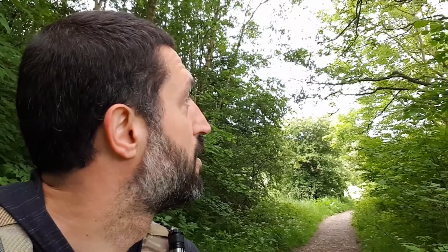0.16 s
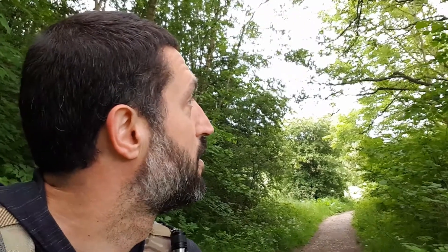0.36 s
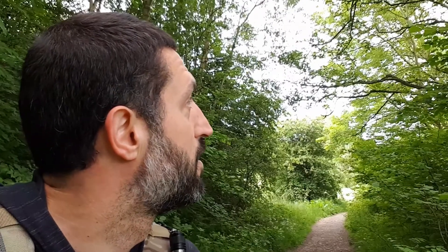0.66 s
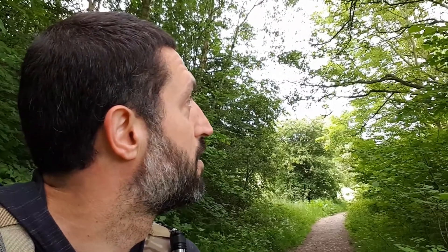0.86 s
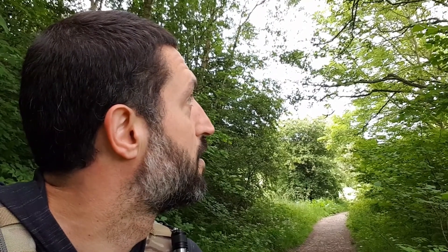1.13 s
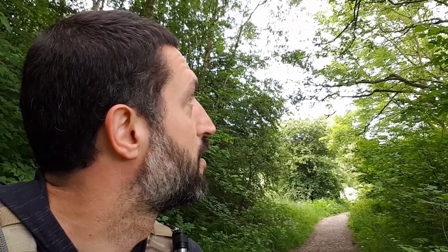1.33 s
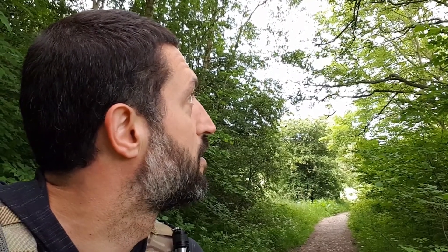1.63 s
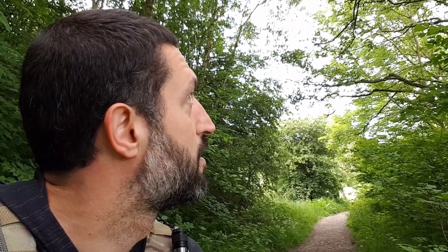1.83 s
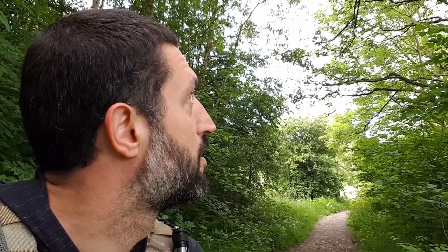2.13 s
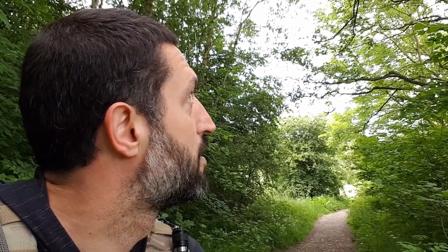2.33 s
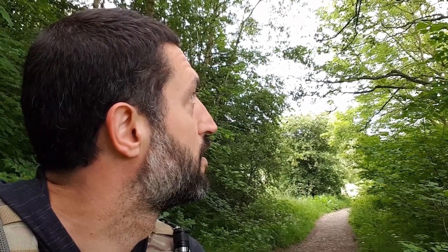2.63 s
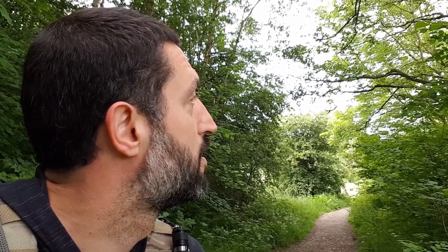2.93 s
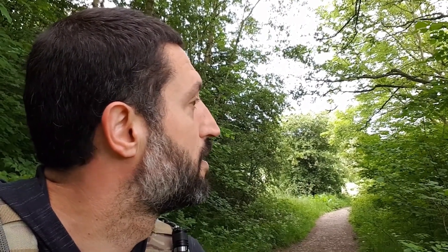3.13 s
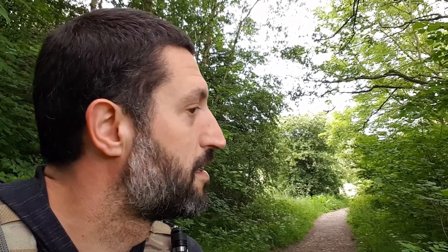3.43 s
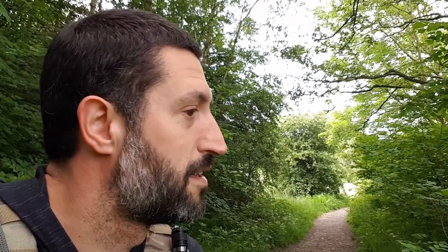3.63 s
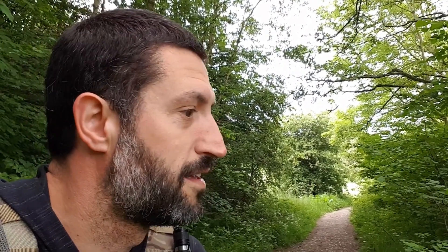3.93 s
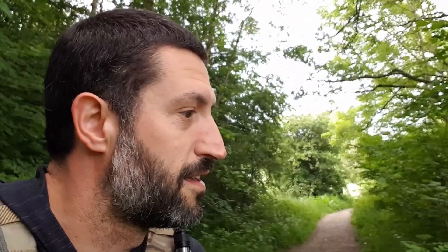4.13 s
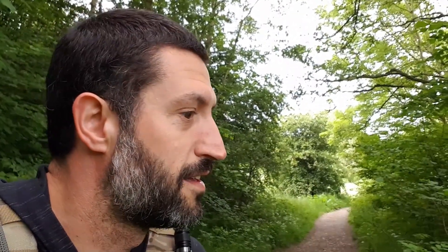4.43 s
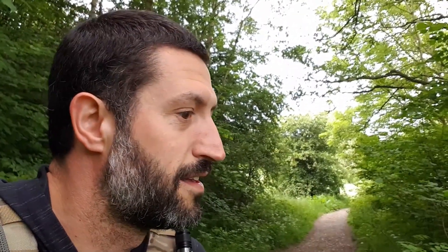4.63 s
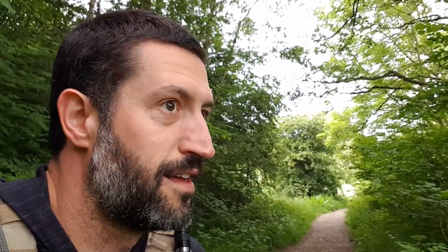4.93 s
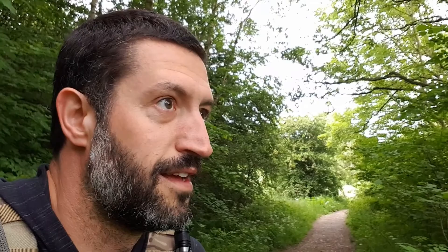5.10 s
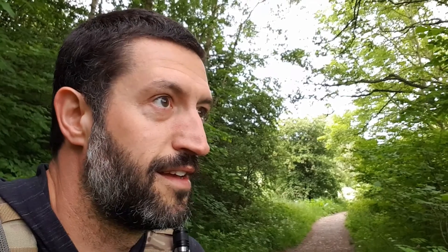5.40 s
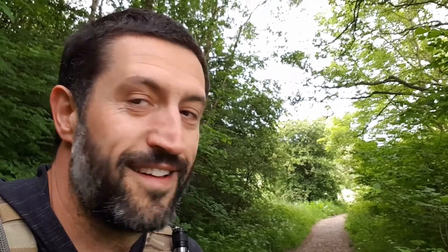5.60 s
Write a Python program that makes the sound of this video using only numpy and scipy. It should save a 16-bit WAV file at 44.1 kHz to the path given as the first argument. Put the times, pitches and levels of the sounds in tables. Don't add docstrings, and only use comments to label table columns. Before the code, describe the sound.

Outdoor birdsong chorus: a dense burst of chirps at first, a curved whistle before one second, flurries through two and three seconds, a sparser stretch after four, then sharp bright chirps near five and at the end. Constant airy hiss and low distant rumble stay behind, with little clicks of twigs. The compact stereo microphone gives a bright, slightly edgy sound.

```python
import sys
import numpy as np
from scipy import signal
from scipy.fft import rfft, irfft
from scipy.io import wavfile
from scipy.ndimage import uniform_filter1d, map_coordinates

SR = 44100
rng = np.random.default_rng(int(sys.argv[2]) if len(sys.argv) > 2 else 0)


def transcribe(u):
    v = np.clip(np.atleast_2d(u).T, -1, 1)
    q = np.round(v * 32767).astype(np.int16)
    wavfile.write(sys.argv[1], SR, q)


def field_ratio(decibels):
    return 10 ** (np.asarray(decibels, dtype=float) / 20)


N = 254016


def unit(x):
    return x / np.sqrt(np.mean(x ** 2) + 1e-20)


def along(points, hz):
    f, v = np.transpose(points)
    return np.interp(np.log(hz + 1), np.log(f + 1), v)


def coloured(x, points):
    return irfft(rfft(x) * field_ratio(along(points, np.fft.rfftfreq(N, 1 / SR))), N)


def wobble(rate_hz, size):
    knots = rng.standard_normal(int(size * rate_hz / SR) + 4)
    return map_coordinates(knots, [np.arange(size) * rate_hz / SR])


# f/Hz, likeness/0-1
PORT_LIKENESS = [(60, .86), (200, .45), (350, .65), (500, .85), (1000, .78), (2000, .68), (2600, .25),
                 (3500, .05), (10000, .0)]
# f/Hz, level/dB
PORT_TILT = [(60, 3.5), (200, 1.5), (380, 8.5), (700, 5.5), (1290, -3), (2380, -2), (4400, 8.5),
             (6900, 6.5), (7900, 11), (9300, 6.5), (11000, 18), (12700, 25), (14200, 26.5), (15600, -15)]
# f/Hz, phase/rad
HOUSING_PHASE = [(60, .1), (400, .3), (950, .9), (1200, .5), (1700, .35), (2300, -.5)]


def rush(spectrum, patchy_db):
    lag_samples = 18.44
    z = signal.stft(rng.standard_normal((2, N)), nperseg=512)[2]
    field = uniform_filter1d(rng.standard_normal(z.shape[1:]), size=6, axis=0)
    field = uniform_filter1d(field, size=12, axis=1)
    pair = signal.istft(z * field_ratio(patchy_db * unit(field)), nperseg=512)[1][:, :N]

    hz = np.fft.rfftfreq(N, 1 / SR)
    turn = np.arccos(np.clip(along(PORT_LIKENESS, hz), 0, 1)) / 2
    gain = field_ratio(along(spectrum, hz))
    shared, own = rfft(pair) * gain * [np.cos(turn), np.sin(turn)]
    tilt = field_ratio(along(PORT_TILT, hz) / 2)
    lead = 2 * np.pi * hz * lag_samples / SR - along(HOUSING_PHASE, hz)
    left = (shared + own) * tilt * np.exp(1j * lead)
    right = (shared - own) / tilt
    both = irfft(np.array([left, right]), N)
    return both / np.sqrt(np.mean(both.mean(axis=0) ** 2))


# f/Hz, density/dB per Hz
HISS_SPECTRUM = [(150, -65), (250, -26), (600, -5), (880, -2.5), (1300, -2), (1630, -1.5), (1970, 0),
                 (2650, -5.5), (3700, -9), (5800, -13.5), (7000, -12.5), (7600, -18), (8100, -25.5),
                 (10000, -59)]
# f/Hz, density/dB per Hz
SIZZLE_SPECTRUM = [(7000, -33), (8200, -10), (9500, -4), (11000, -6), (12550, -6.5), (13300, -8),
                   (14300, -21), (15200, -11), (15800, -20)]
# f/Hz, density/dB per Hz
RUMBLE_SPECTRUM = [(20, -22), (32, -22), (41, -5), (52, 0.5), (65, 1), (110, -1.5), (210, -18), (300, -17),
                   (390, -30.5)]
# t/s, level/dB
TRAFFIC_LEVEL = [
    (0.0, -44),
    (4.41, -44),
    (4.75, -43.5),
    (5.76, -45),
]
# t/s, level/dB
BREEZE_LEVEL = [
    (0.0, -53),
    (.45, -54),
    (5.76, -55.5),
]


def air():
    rumble_under_hiss_db = -12
    t = np.arange(N) / SR
    traffic_db = np.interp(t, *np.transpose(TRAFFIC_LEVEL))
    sizzle_db = np.interp(t, *np.transpose(BREEZE_LEVEL))
    hiss = rush(HISS_SPECTRUM, patchy_db=2.0)
    sizzle = rush(SIZZLE_SPECTRUM, patchy_db=1)
    rumble = rush(RUMBLE_SPECTRUM, patchy_db=-1.45)
    hiss_drift_db = .5 * wobble(rate_hz=6, size=N)
    sizzle_drift_db = .8 * wobble(rate_hz=25, size=N)
    return (field_ratio(traffic_db + hiss_drift_db) * hiss + field_ratio(sizzle_db + sizzle_drift_db) * sizzle
            + field_ratio(traffic_db + rumble_under_hiss_db) * rumble)


# bend of the glide (0 straight, more settles sooner), peak/share of length, swell/dB, fade/dB
HELD = (5.5, .2, 4, 9)
SWEEP = (0.53, 0.087, 0.74, 2.6)
THIN = (0.92, 0.17, 1.5, 2.8)
CLOSE_ECHO_DB, FAR_ECHO_DB = -4, -0.5


def contour(row, manner):
    s, length_s, from_hz, to_hz, db = row
    bend, peak, swell_db, fade_db = manner
    u = np.arange(13) / 12
    bend = max(bend, .01)
    glide = (1 - np.exp(-bend * u)) / (1 - np.exp(-bend))
    shape_db = np.interp(u, [0, np.clip(peak, .05, .95), 1], [-swell_db, 0, -fade_db])
    return np.column_stack([s + length_s * u, from_hz + (to_hz - from_hz) * glide, db + shape_db])


# f/Hz, level/dB
NEAR_SHADOW = [(2200, -6), (3000, 10), (4300, 15.5), (5500, 21.5), (7200, 34)]


def near(rows, manner):
    return [(contour(row, manner), along(NEAR_SHADOW, (row[2] + row[3]) / 2), 0) for row in rows]


# t/s, length/s, f_from/Hz, f_settled/Hz, level/dB
WHISTLES = [ (0.0, .02, 5410, 4820, -35.5), (0.085, 0.054, 4590, 5090, -32.5),
            (0.269, 0.0081, 7220, 6840, -34), (0.32, 0.064, 6450, 6650, -33),
            (1.377, .03, 6050, 6300, -40), (1.439, 0.013, 5580, 5210, -28.5),
            (1.551, 0.088, 6400, 6500, -40), (1.716, .075, 4770, 4946, -35),
            (1.889, 0.028, 4780, 5060, -34), (2.048, 0.038, 5800, 4950, -29.5),
            (2.029, 0.015, 6380, 6250, -35), (2.232, 0.1, 6750, 6880, -43),
            (2.358, 0.038, 6740, 7240, -34.5), (2.542, .018, 5600, 5320, -36),
            (2.65, 0.02, 5450, 5300, -38.5), (3.065, .028, 5810, 5660, -31),
            (3.095, .02, 5740, 5290, -35.5), (3.397, 0.048, 5800, 5586, -32.5),
            (3.468, 0.019, 6600, 6960, -36.5), (3.74, 0.048, 4520, 4480, -35),
            (3.777, 0.082, 4490, 4444, -30), (5.41, 0.013, 6760, 6560, -24.5),
            (5.487, 0.014, 5700, 5850, -26), (5.663, 0.015, 6730, 6620, -40),
            (3.033, 0.013, 7550, 7640, -31),
            (.142, 0.046, 4145, 4330, -27.5), (0.322, 0.042, 4200, 4590, -37.5),
                (0.574, 0.015, 4360, 4435, -36), (0.581, 0.032, 3080, 3220, -36),
                (0.603, .05, 3230, 3092, -32), (0.775, .02, 3340, 3310, -37.5),
                (1.285, 0.042, 4480, 4450, -37), (1.712, 0.069, 3710, 3880, -35.5),
                (1.762, 0.053, 3850, 3745, -29), (1.882, 0.053, 3960, 3830, -37),
                (2.308, 0.024, 3700, 3855, -24.5), (2.335, 0.021, 3740, 3875, -26.5),
                (2.37, 0.12, 3820, 3843, -37.5), (2.67, 0.022, 3910, 3630, -29.5),
                (2.847, 0.09, 2912, 3064, -37.5), (3.995, 0.084, 3630, 3850, -39),
                (5.033, 0.023, 5110, 5056, -31.5), (5.057, 0.029, 3760, 3550, -32),
                (5.491, 0.022, 4820, 4770, -32.5), (5.742, .016, 2723, 2650, -34),
                (3.02, 0.039, 4430, 4790, -45)]


def held_whistles():
    return near(WHISTLES, HELD)


# t/s, length/s, f_from/Hz, f_to/Hz, level/dB
GLIDES = [ (0.013, .016, 8150, 7900, -41), (.027, 0.0083, 7820, 5740, -27),
          (.288, 0.042, 6000, 6470, -35), (0.264, 0.0079, 5300, 7350, -30),
          (1.255, 0.0069, 7590, 6150, -28), (1.26, 0.013, 6160, 5640, -29),
          (1.504, 0.013, 7660, 6590, -30), (1.511, 0.014, 6750, 5580, -31.5),
          (1.531, .022, 5610, 6410, -34), (2.005, 0.0075, 7480, 6400, -30.5),
          (2.012, 0.012, 6710, 5620, -27.5), (2.039, 0.0059, 4300, 5630, -29),
          (2.222, .013, 7450, 7350, -45), (2.492, 0.045, 6300, 5450, -46),
          (2.557, .03, 5100, 4670, -41), (2.627, .02, 5900, 5300, -41),
          (3.016, 0.019, 6760, 7760, -32.5), (3.051, 0.016, 7110, 5680, -30),
          (3.032, 0.021, 7200, 6930, -34), (3.389, .008, 5860, 4770, -27),
          (3.395, 0.0074, 4910, 5950, -26.5), (3.66, 0.011, 5630, 6310, -28.5),
          (3.673, .022, 6200, 5430, -28.5), (3.693, 0.017, 5420, 5260, -25),
          (3.712, 0.027, 5110, 4500, -30), (4.454, 0.015, 5700, 5820, -31.5),
          (4.46, 0.014, 5370, 5240, -37), (4.47, 0.0067, 5800, 6740, -31),
          (4.48, .008, 5760, 6650, -36), (5.405, 0.0082, 7400, 6700, -29),
          (5.481, 0.0073, 5150, 5800, -31.5), (5.652, 0.01, 7280, 6480, -34),
          (0.126, .022, 3950, 4260, -31), (0.626, .018, 3090, 2770, -38),
              (0.884, 0.024, 2474, 2355, -36.5), (.911, 0.022, 2260, 2160, -36),
              (5.014, 0.017, 3980, 4450, -39), (0.872, 0.0066, 3400, 2700, -29),
              (1.268, .012, 5650, 3880, -34.5), (1.396, .007, 5000, 4600, -35.5),
              (2.116, 0.016, 4214, 3300, -31.5), (2.125, 0.0076, 3370, 2920, -25.5),
              (2.134, .012, 3010, 3180, -34.5), (2.164, 0.017, 2736, 3720, -28),
              (2.252, .02, 4270, 4150, -35), (2.268, 0.042, 4284, 3750, -34.5),
              (2.238, .02, 2920, 3300, -47), (2.404, 0.019, 2996, 2374, -31.5),
              (2.427, 0.048, 2450, 1944, -37.5), (2.641, .027, 4230, 3680, -36),
              (2.664, .012, 4600, 3850, -32), (2.681, 0.019, 3490, 2750, -37),
              (2.636, 0.007, 4100, 3930, -41), (2.826, 0.013, 2564, 3620, -29.5),
              (3.484, .02, 2950, 2380, -34.5), (3.5, .042, 2452, 2356, -37),
              (3.516, 0.039, 2790, 2500, -40), (3.564, 0.039, 2530, 2390, -40),
              (3.899, 0.015, 3780, 3770, -38), (3.918, 0.044, 3835, 3810, -30),
              (3.943, 0.018, 3795, 2950, -28), (3.953, 0.013, 3940, 3744, -29),
              (3.956, 0.026, 3000, 3670, -46), (4.528, 0.017, 5380, 4360, -34),
              (4.544, 0.016, 5060, 4470, -36.5), (4.548, 0.028, 4300, 2990, -38.5),
              (4.573, 0.013, 3670, 4350, -34), (5.038, 0.0049, 5000, 4030, -25),
              (5.045, 0.0082, 4010, 4190, -30), (5.057, 0.0072, 3610, 2700, -30.5),
              (5.478, 0.0083, 3940, 4720, -33), (5.721, 0.029, 2540, 2702, -35)]


def quick_sweeps():
    return near(GLIDES, SWEEP)


# t/s, length/s, f_from/Hz, f_to/Hz, level/dB
VOICE_SUMS = [ (0.127, 0.051, 12100, 12900, -48), (0.286, .09, 12300, 13600, -42.5),
              (0.322, 0.061, 10600, 11300, -48), (1.377, 0.037, 12540, 12600, -41.5),
              (1.707, 0.056, 12300, 12700, -45.5), (1.884, 0.042, 11740, 11500, -47),
              (1.886, 0.038, 13000, 12950, -44), (1.886, .04, 14100, 14150, -54),
              (3.026, 0.02, 11700, 12800, -35), (3.037, 0.05, 12500, 11050, -40.5),
              (3.77, .07, 13800, 13700, -54), (3.912, .06, 11700, 11700, -50),
              (5.02, 0.014, 12200, 12000, -45), (5.478, 0.035, 10560, 10560, -45)]


def sum_tones():
    return near(VOICE_SUMS, THIN)


# t/s, length/s, f_from/Hz, f_to/Hz, level/dB
LOW_HOOTS = [
    (.372, 0.029, 558, 539, -43),
    (.515, 0.032, 563, 516, -46),
    (3.957, 0.03, 514, 500, -45.5),
    (4.86, 0.023, 486, 462, -48),
]


def hoots():
    return [(contour(row, THIN), 8, CLOSE_ECHO_DB) for row in LOW_HOOTS]


# t/s, level/dB peak, f/Hz
TWIG_TICKS = [(.5686, -46, 12700), (.717, -47, 12500), (0.9786, -41, 6600), (1.021, -42.5, 6570),
              (1.0794, -56, 12300), (1.1894, -66, 7050), (1.4631, -40, 5300), (1.6262, -47, 6510),
              (2.3794, -48, 7190), (2.446, -48, 7340), (4.475, -47, 7800), (4.5694, -46, 7000),
              (4.774, -49, 11800), (4.8244, -44, 5740), (5.0065, -49, 6900), (5.1594, -44, 5130)]


def twigs():
    out = np.zeros(N + SR)
    t = np.arange(SR // 100) / SR
    chance = rng.random((40, 3))
    stray = np.column_stack([chance[:, 0] * N / SR, -58 + 8 * chance[:, 1], 6500 + 7000 * chance[:, 2]])
    for s, db, hz in [*TWIG_TICKS, *stray]:
        snap = np.sin(2 * np.pi * hz * t) + 0.22 * rng.standard_normal(len(t))
        out[round(s * SR):][:len(t)] += field_ratio(db - 60 * t / .005) * np.diff(snap, prepend=0)
    ticks = coloured(out[:N], [(3000, -30), (6000, 14.0), (13000, 12.0), (15500, -30)])
    return ticks * field_ratio([[3], [-12]])


# t/s, length/s, f_from/Hz, f_settled/Hz, level/dB
DEEP_WOOD = [ (3.49, .03, 3850, 3750, -48), (4.562, .01, 2200, 2350, -42), (2.636, .02, 2750, 2800, -47),
             (1.148, .045, 4050, 4080, -47), (1.545, .03, 4100, 4350, -50), (2.775, .03, 4800, 4680, -48),
             (3.4, .02, 4200, 4600, -45), (4.359, .07, 3350, 3150, -48), (4.646, .035, 3340, 3330, -47),
             (4.662, .012, 2450, 2420, -45), (4.69, .012, 2400, 2380, -44), (.62, .02, 4450, 4430, -45),
             (4.738, .02, 4420, 4300, -45), (4.812, .012, 3450, 3300, -46), (4.857, .018, 2060, 2010, -42),
             (4.952, .035, 3510, 3480, -48), (5.325, .03, 3600, 3600, -48), (5.402, .015, 5000, 4900, -43),
             (4.537, .018, 2860, 2880, -43)]


def far_birds():
    return [(contour(row, THIN), 7, FAR_ECHO_DB) for row in DEEP_WOOD]


# t/s, f/Hz, level/dB
CURVED_NOTE = [
    (.66, 3090, -30),
    (.669, 2964, -28.5),
    (.689, 2828, -26.5),
    (.729, 2804, -31),
    (.747, 2800, -37),
    (.791, 2903, -28),
    (.803, 2946, -36),
    (.84, 2880, -37),
]


def curved_whistle():
    return [(np.array(CURVED_NOTE), 2, CLOSE_ECHO_DB)]


# t/s, length/s, f_from/Hz, f_to/Hz, level/dB
VERY_HIGH_NOTES = [(3.154, 0.032, 8230, 8000, -44), (3.178, 0.029, 7970, 7840, -39.5),
                   (3.199, .07, 7820, 7750, -39), (3.228, 0.027, 8800, 9170, -40),
                   (3.268, 0.031, 7500, 7100, -37), (3.306, .045, 7200, 8080, -39),
                   (3.348, 0.033, 7900, 7360, -38.5), (3.396, 0.014, 7200, 7570, -36),
                   (5.59, 0.037, 8330, 7950, -43), (5.62, .02, 7940, 8600, -39.5),
                   (5.641, 0.041, 8000, 7400, -42)]


def very_high_bird():
    return [(contour(row, THIN), 10, FAR_ECHO_DB) for row in VERY_HIGH_NOTES]


def song():
    near_notes = quick_sweeps() + held_whistles() + sum_tones()
    return near_notes + very_high_bird() + far_birds() + hoots() + curved_whistle()


def whistle(note, fade_s):
    s, hz, db = np.transpose(note)
    t = np.arange(s[0] - fade_s, s[-1] + fade_s, 1 / SR)
    pitch = np.interp(t, s, hz) * (1 + .008 * wobble(rate_hz=180, size=SR // 5)[:len(t)])
    tone = np.sqrt(2) * np.sin(2 * np.pi * np.cumsum(pitch) / SR)
    edges = np.clip(np.minimum(t - t[0], t[-1] - t) / (2 * fade_s), 0, 1)
    flutter_db = 3.5 * np.tanh(wobble(rate_hz=112, size=SR // 5)[:len(t)])
    return t[0], tone * edges * field_ratio(np.interp(t, s, db) + flutter_db)


# f/Hz, t60/s
TRUNK_DECAY = [(2000, 0.65), (5000, 0.59), (9000, 0.61), (14000, 0.38)]


def scatter(onset_s):
    hz, t, z = signal.stft(rng.standard_normal((2, SR // 2)), SR, nperseg=256)
    strands_db = 1.5 * rng.standard_normal(len(hz))
    decay_db = strands_db[:, None] - 60 * t / along(TRUNK_DECAY, hz)[:, None]
    tail = signal.istft(z * field_ratio(decay_db), SR, nperseg=256)[1]
    age_s = np.arange(tail.shape[1]) / SR
    tail = tail * (1 - np.exp(-age_s / onset_s))
    tail = tail * (1 + 0.72 * np.exp(-age_s / 0.037))
    tail = tail * field_ratio(1.5 * np.tanh(wobble(rate_hz=94, size=len(age_s))))
    return tail / np.linalg.norm(tail[0])


def birds():
    out = np.zeros((2, N + 2 * SR))
    tails = [scatter(onset_s=0.001) for _ in range(37)]
    for k, (note, pan_db, wet_db) in enumerate(song()):
        start_s, voice = whistle(note, fade_s=.002)
        at = round(start_s * SR) + SR // 2
        sides = unit(field_ratio([[pan_db / 2], [-pan_db / 2]]))
        echo = field_ratio(wet_db - 0.5) * signal.fftconvolve(voice[None], tails[k % len(tails)], axes=1)
        out[:, at:at + len(voice)] += field_ratio(-6.5) * sides * voice
        out[:, at:at + echo.shape[1]] += sides ** 0.35 * echo
    return out[:, SR // 2:][:, :N]


def scene():
    return air() + twigs() + birds()


def band_limit(x):
    return signal.sosfilt(signal.butter(12, 15800, fs=SR, output="sos"), x)


# f/Hz, level/dB
PORT_RESONANCE = [(5000, -56), (7000, -15.5), (9300, -10.5), (11000, -6), (12600, 7), (13600, -9),
                  (14500, -2), (16000, -26)]


def record(dry):
    song_band = coloured(dry, [(2000, -60), (3200, 0), (9000, 0), (10000, -60)])
    strength = np.sqrt(np.abs(uniform_filter1d(song_band ** 2, size=400, axis=1))) + 1e-4
    second_order = field_ratio(-14.0) * song_band ** 2 / strength
    third_order = field_ratio(-18.5) * song_band ** 3 / strength ** 2
    return band_limit(dry + coloured(second_order + third_order, PORT_RESONANCE))


dry = scene()
out = record(dry)
transcribe(out)
```